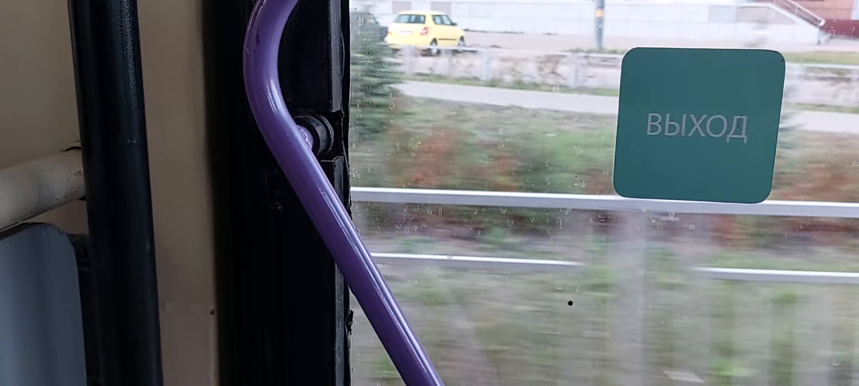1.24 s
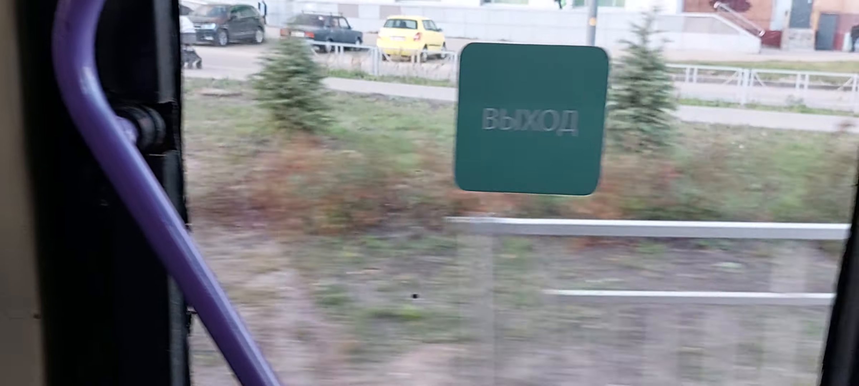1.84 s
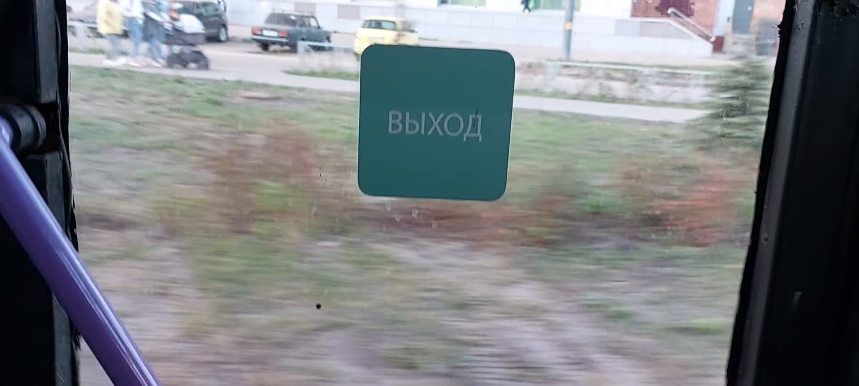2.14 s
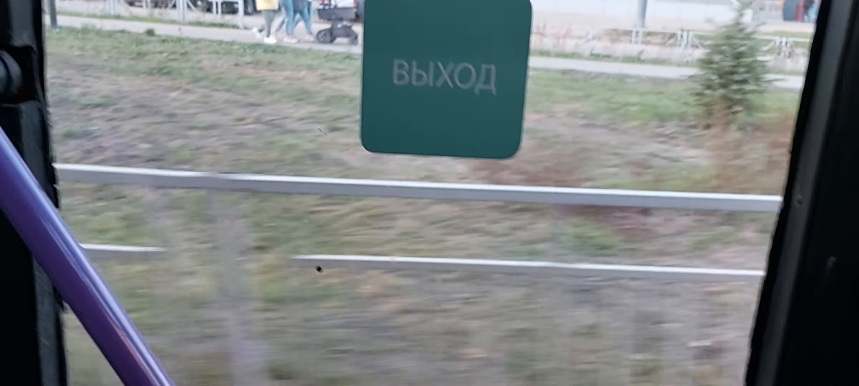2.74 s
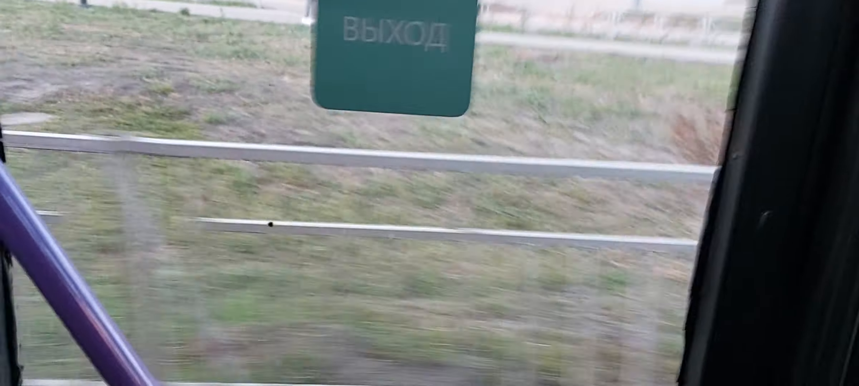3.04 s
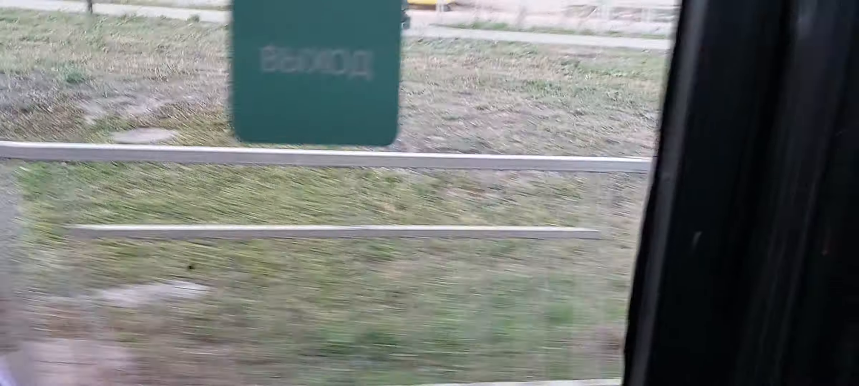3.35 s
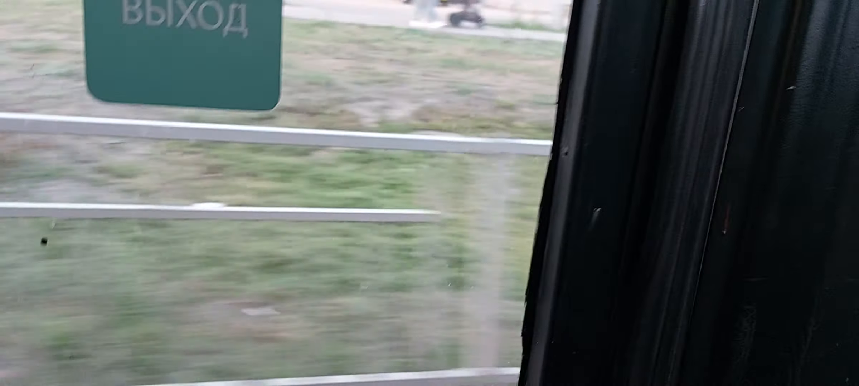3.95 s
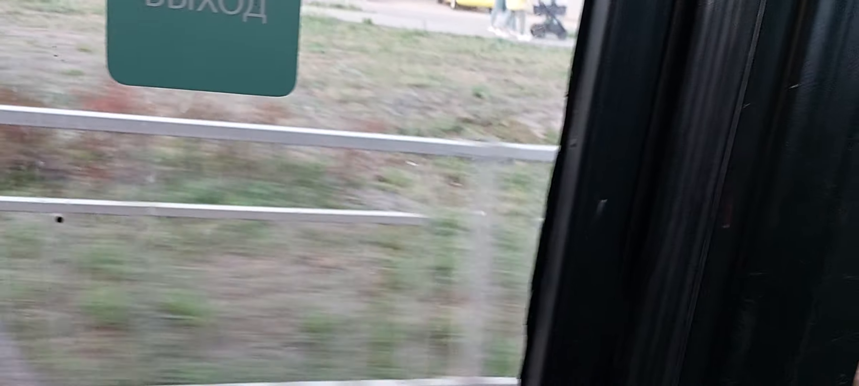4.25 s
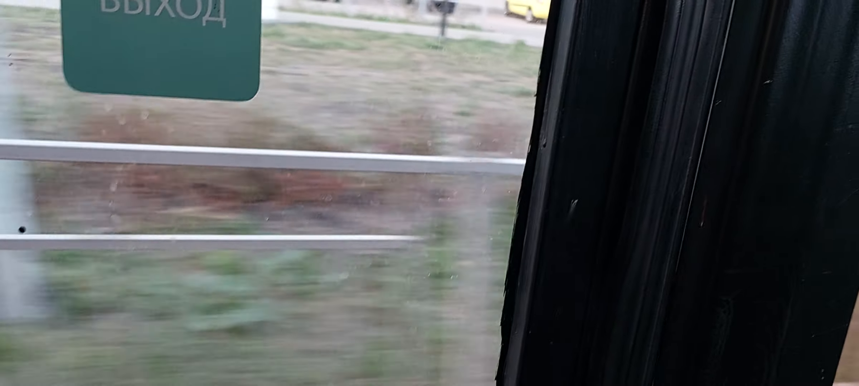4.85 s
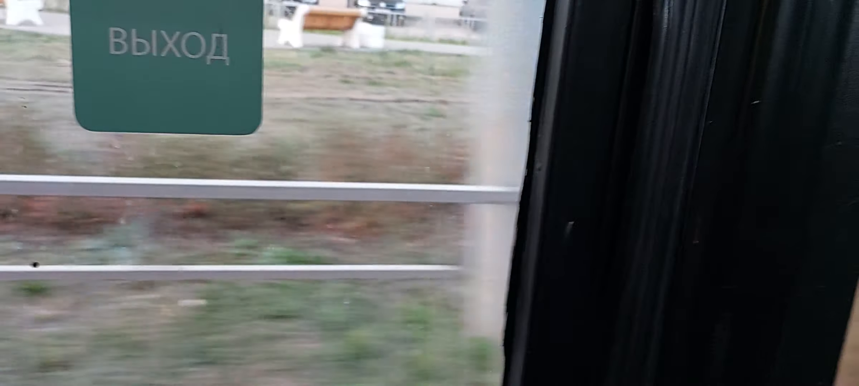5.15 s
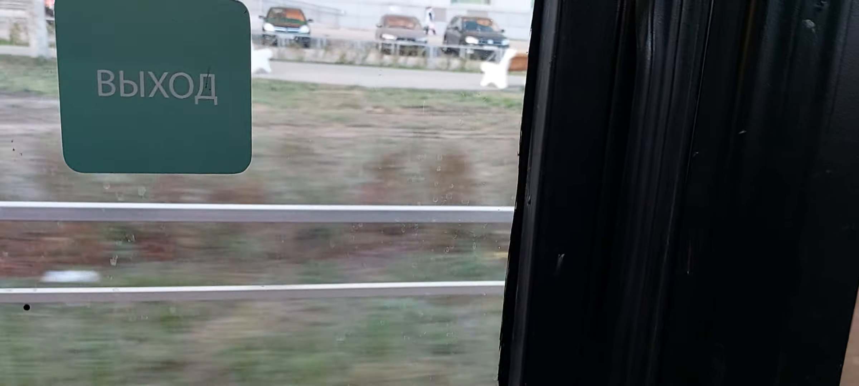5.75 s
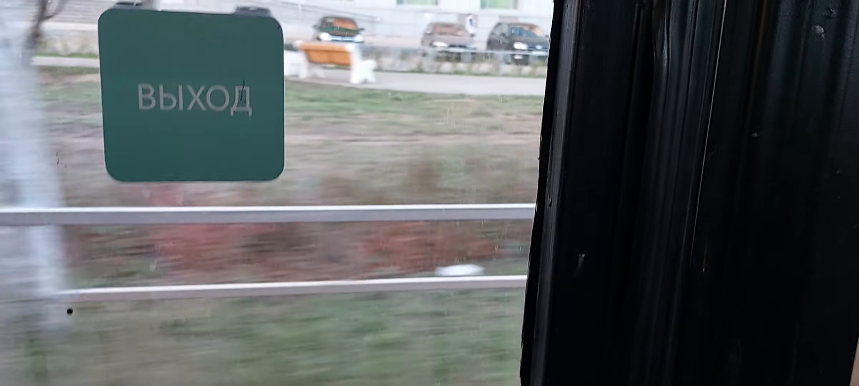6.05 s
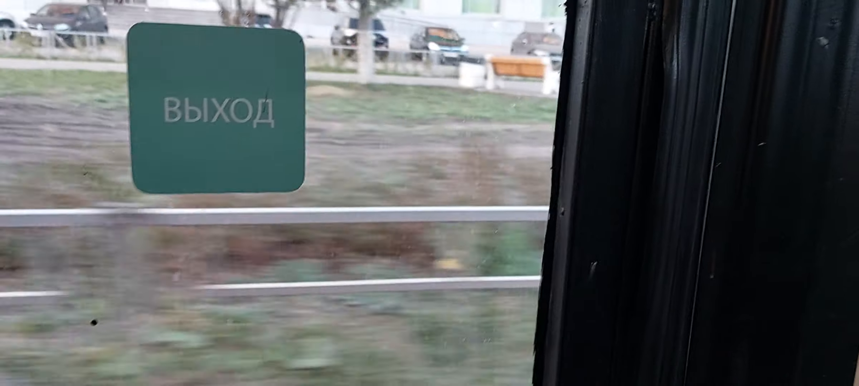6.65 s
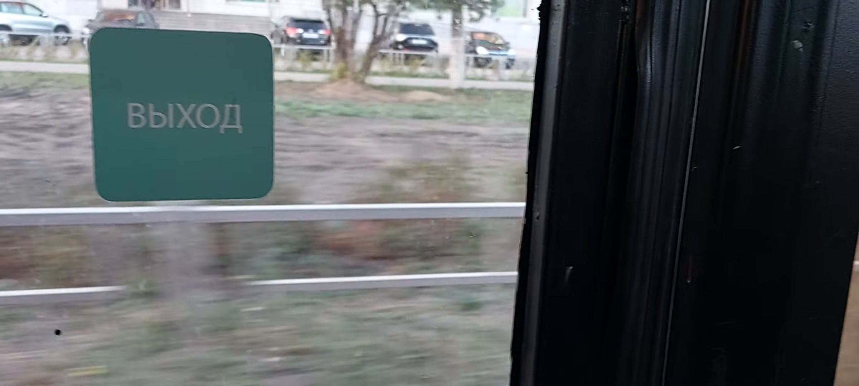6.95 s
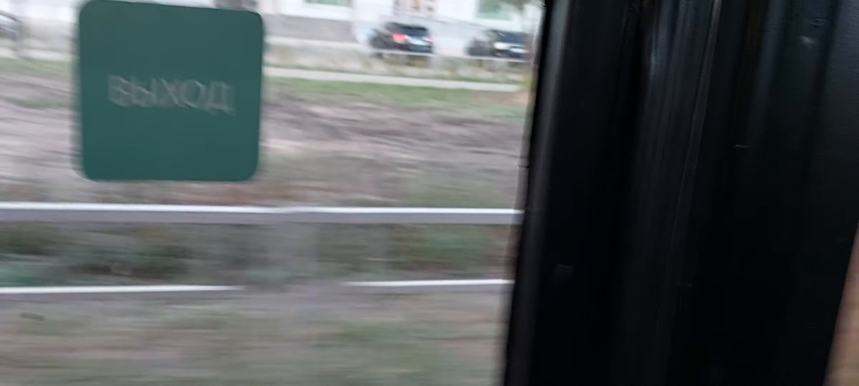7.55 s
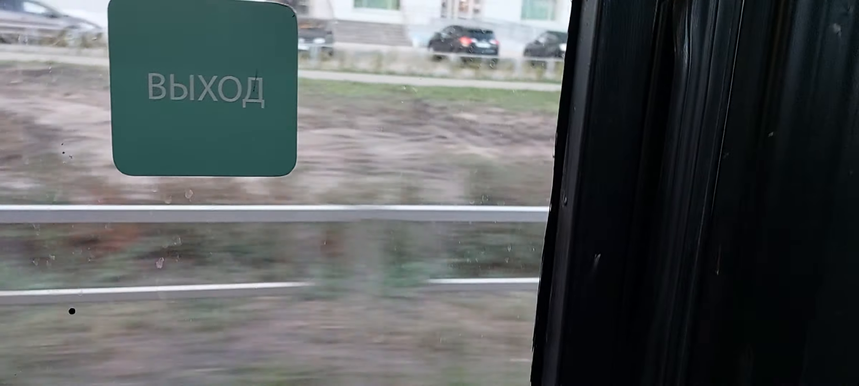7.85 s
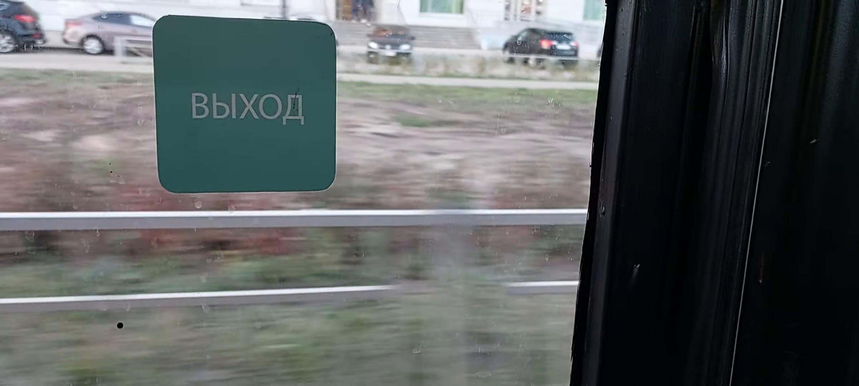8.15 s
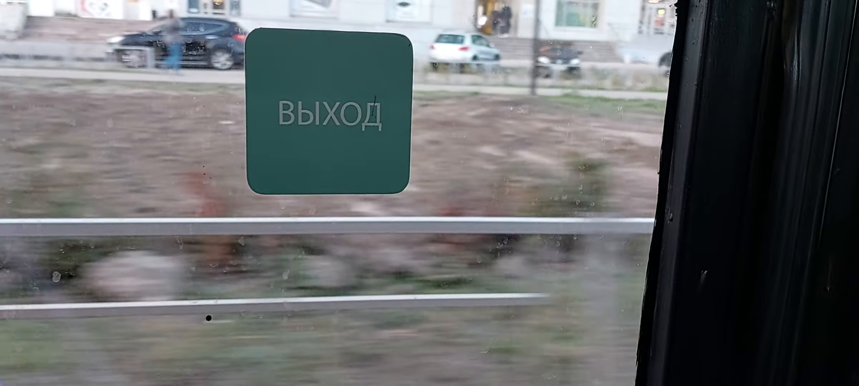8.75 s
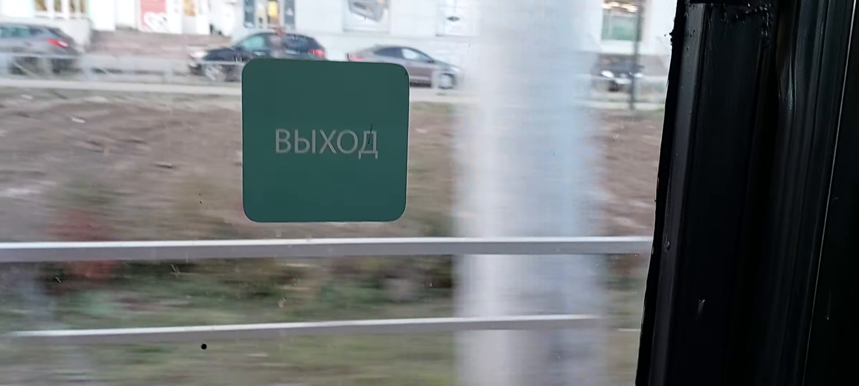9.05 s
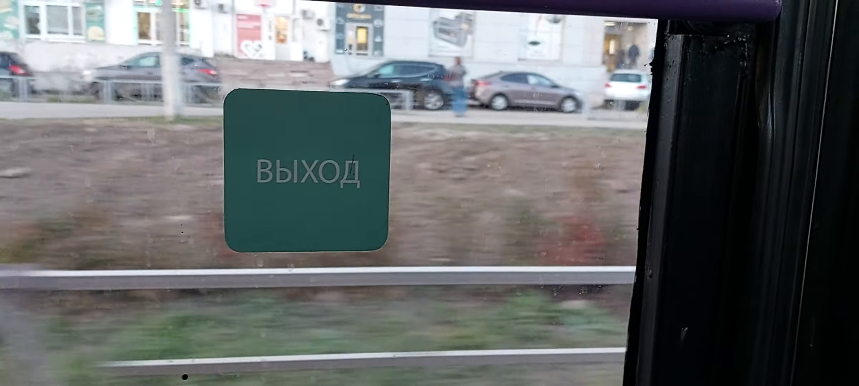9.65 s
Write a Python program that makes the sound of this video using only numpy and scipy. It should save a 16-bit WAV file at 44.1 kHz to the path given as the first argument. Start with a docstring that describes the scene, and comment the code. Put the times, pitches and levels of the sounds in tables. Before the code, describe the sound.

A trolleybus rolls along with road rumble, rattling fittings and thuds; its motor hum rises, then cuts out as it coasts.

```python
"""A traction drive hums over the rumble, roar and cabin boom of rolling tyres: inside a moving trolleybus,
a stereo microphone close by the door. Panels tremble, and chatter on rough patches; loose metal fittings
click and the body thuds in the dips. On the biggest bump the door bangs against its frame and a bracket
squeals briefly. The hum climbs in pitch and a dry joint starts to chirp; about six seconds in, the power
cuts out and the bus coasts on, still rattling."""
import sys
import numpy as np
from scipy import signal
from scipy.fft import rfft, irfft, next_fast_len
from scipy.io import wavfile
from scipy.ndimage import uniform_filter1d

SR = 44100
rng = np.random.default_rng(int(sys.argv[2]) if len(sys.argv) > 2 else 0)


def file_out(sig):
    """Save sig as 16-bit WAV at sys.argv[1]."""
    # one column per channel
    cols = np.atleast_2d(sig).T
    # limit, then scale
    lim = np.clip(cols, -1, 1)
    pcm = np.round(lim * 32767).astype(np.int16)
    wavfile.write(sys.argv[1], SR, pcm)


N = 436149
TIME = np.arange(N) / SR
LEFT_LEAD_S = .00053  # knocks reach the left of the microphone this much sooner

# Levels in the tables are relative: each source adds its own gain.
# drive speed, rising under power and falling as the bus coasts: (time [s], hum pitch [Hz])
DRIVE_PITCH = [(0, 119.9), (3.8, 121.1), (4.5, 125.6), (5.2, 133), (5.7, 137.6), (6.3, 141.5), (7.9, 138.8),
               (9.88, 128)]
# fundamental of the hum: (time [s], level [dB])
HUM_LEVEL = [(0, -34), (.37, -18), (.87, -34), (1.6, -33), (2.15, -23), (2.77, -17), (3.28, -26.5),
             (3.68, -16.5), (5.5, -15), (6.16, -31)]
# load on the drive, heard in its overtones: (time [s], level [dB])
DRIVE_LOAD = [(0, -34.5), (.4, -30.5), (.7, -42), (1.7, -40), (2, -29.5), (2.9, -30.5), (3.7, -33),
              (5.2, -31), (6.15, -34)]
# overtones of the hum: (multiple of the pitch, level [dB])
HUM_OVERTONES = [(2, 1), (3, -6.5), (4, -9), (5, -17), (6, -17.5)]
# air modes of the cabin: (frequency [Hz], width [Hz], lift [dB])
CABIN_MODES = [(161.5, 11, 6), (209, 31.5, 5.5), (259.3, 25, 4), (372, 30, 4), (413, 18, 5.5), (562, 26, 3)]
# likeness of the cabin sound on the two channels: (frequency [Hz], correlation)
STEREO_LIKENESS = [(60, 1), (140, 0.95), (260, 0.94), (500, 0.74), (900, 0.2), (1400, 0.22)]
# earlier arrival of the cabin sound on the left: (frequency [Hz], lead [s])
STEREO_LEAD = [(150, 0.00018), (850, 0.00019), (1100, 0.000392)]
# balance of the cabin sound: (frequency [Hz], left minus right [dB])
STEREO_BALANCE = [(170, -1.5), (500, -4), (1000, -2), (3000, -3), (8000, 10)]
# grain of the road surface: (time [s], body roar [dB], tyre rush [dB])
ROAD_GRAIN = [(0, -30, -37.5), (.85, -30, -36.5), (1.4, -25.5, -36), (2.9, -30.5, -39), (4.5, -34.5, -43.5),
              (5.2, -29, -41), (6.85, -33, -43), (7.25, -27.5, -36.5), (8.6, -29, -42), (9.88, -25.5, -37)]
# shaking of the body: (time [s], rumble [dB], cabin boom [dB])
BODY_SHAKE = [(0, -34, -23), (.55, -35, -29), (1.42, -32, -23), (2.9, -36, -23.5), (3.12, -19.5, -20),
              (3.48, -32, -20), (3.66, -39, -32.5), (5.5, -37.5, -24), (6.66, -37.5, -30.5),
              (7.4, -26.5, -19), (8, -34, -21), (9.88, -34, -23)]
# spectra of body rumble, body roar and rattling panels: (frequency [Hz], level [dB])
RUMBLE_SPECTRUM = [(12, -25), (40, -7), (50, 3), (62, 0), (90, -27.5), (200, -61.5)]
ROAR_SPECTRUM = [(50, -32.5), (95, 5.5), (135, 10), (185, -1), (300, 0.5), (500, -7), (660, -14),
                 (850, -16.5), (3000, -87.5)]
PANEL_SPECTRUM = [(1500, -9.5), (2500, 3.5), (4200, 5.5), (5400, 3), (7000, -7.5), (9400, -17), (11300, -7),
                  (13500, -3.5), (16000, -16)]
# tyre rush, with the microphone's dip near 9 kHz and lift near 13 kHz: (frequency [Hz], level [dB])
RUSH_AT_MICROPHONE = [(300, -8), (780, 6), (1500, -1.5), (2400, -9.5), (5000, -23.5), (9300, -39.5),
                      (12800, -37.5), (16000, -45)]
# resonances of the door panels: (frequency [Hz], width [Hz], lift [dB])
DOOR_PANEL_MODES = [(2320, 320, 6.5), (2775, 77, 6.5), (6050, 28, 0.5)]
# rough patches of road: (time [s], length [s], panel chatter [dB], road noise lift [dB])
ROUGH_PATCHES = [(0.085, 0.052, -59.5, 3), (0.46, 0.06, -62.5, -0.5), (0.577, 0.02, -54.5, 0.5),
                 (0.74, 0.084, -63, -0.5), (1.06, 0.047, -56, 3.5), (1.486, 0.056, -70, 1.5),
                 (1.716, 0.069, -50.5, -1.5), (1.885, 0.036, -52, 4.5), (1.992, 0.062, -56.5, 0),
                 (2.984, 0.48, -56.5, 5), (3.501, 0.2, -64.5, 5.5), (5.71, 0.026, -57.5, 1),
                 (5.827, 0.035, -57.5, 0), (6.106, 0.13, -63.5, 0.5), (6.492, .15, -65, 5.5),
                 (6.987, 0.29, -62.5, 1.5), (7.323, 0.25, -59, 3), (7.796, 0.26, -62.5, 1),
                 (8.957, 0.035, -61, 0), (9.587, 0.079, -54, 0), (9.703, 0.07, -57.5, -1)]
# loose fittings knock: (time [s], clack [dB], tick [dB])
FITTING_KNOCKS = [(0.338, -58, -50), (1.28, -36, -48), (1.678, -33, -41), (2.057, -32.5, -50),
                  (2.321, -39, -59), (2.798, -43, -43.5), (3.125, -35, -37), (3.152, -32, -35),
                  (3.222, -36, -32.5), (3.335, -30.5, -33), (3.402, -28.5, -34), (3.474, -37, -40),
                  (3.498, -33, -39), (3.563, -26.5, -34), (3.668, -38, -42), (3.7247, -34.5, -42),
                  (3.891, -35.5, -45), (6.455, -38.5, -50), (6.946, -47, -43), (7.051, -55, -41),
                  (7.319, -28.5, -37), (7.454, -34, -31.5), (7.5174, -31, -27), (7.55, -37, -32),
                  (7.5886, -32, -40), (7.697, -41, -42), (7.7263, -40, -35), (7.989, -37, -33),
                  (8.0117, -34, -30), (8.081, -35.5, -34), (8.109, -36.5, -34), (8.261, -37.5, -66),
                  (8.912, -48, -42)]
# spectra of their dull clack and bright tick: (frequency [Hz], level [dB])
CLACK_SPECTRUM = [(300, -30), (1100, -2), (2500, 0.5), (5300, 1.5), (7000, -6.5), (9500, -19), (16000, -23)]
TICK_SPECTRUM = [(9300, -15), (10800, 4), (11600, -3), (12800, 6), (14200, -1), (16000, -6)]
# the wheels drop into dips: (time [s], shudder [dB], shudder pitch [Hz], floor knock [dB])
JOLTS = [(1.94, -19, 245, -40), (2.095, -20, 241, -45), (3.072, -27.5, 559, -23), (3.18, -28, 580, -28),
         (3.41, -21.5, 296, -28), (6.58, -34, 460, -24), (8.29, -16.5, 280, -40), (9.833, -18.5, 253, -32)]
# modes of the floor panel: (frequency [Hz], level [dB], t60 [s])
FLOOR_MODES = [(526, 3, 0.061), (586, 6, 0.094)]
# the latch snaps in its catch: (time [s], level [dB])
LATCH_SNAPS = [(3.039, -20), (3.631, -39), (3.85, -36.5), (6.331, -42)]
# the door leaf hits its frame and rebounds: (time [s], level [dB])
DOOR_BLOWS = [(3.043, -19), (3.047, -29), (3.077, -30), (3.151, -30), (3.337, -29.5), (3.404, -31),
              (5.727, -39.5), (6.58, -47), (7.396, -34), (7.82, -43), (9.724, -38)]
# spectrum of those blows: (frequency [Hz], level [dB])
BANG_SPECTRUM = [(300, -8), (700, 2.5), (2000, -6.5), (2800, -9), (5500, -20), (16000, -39)]
# modes of the door leaf: (frequency [Hz], level [dB], t60 [s])
DOOR_MODES = [(740, -10, 0.17), (1233, -11, 0.19), (1520, -14, .08), (2230, -11, 0.053), (2510, -16, 0.3),
              (2740, 6.5, 0.02), (2990, -19, 0.2)]
# a bracket scrapes: (time [s], length [s], level [dB], starting pitch [Hz], step per overtone [dB])
BRACKET_SCRAPES = [(3.396, 0.043, -48, 2880, -4), (9.622, 0.049, -52, 2970, -11)]
# spells in which a dry joint chirps: (time [s], length [s], level [dB])
JOINT_SPELLS = [(5.125, .6, -51), (5.984, .09, -42), (6.198, .2, -49), (6.988, .09, -42), (8.339, .07, -42),
                (8.673, .14, -45), (9.213, .1, -44), (9.884, .01, -38)]
# resonances of that joint: (frequency [Hz], width [Hz], level [dB])
JOINT_MODES = [(3000, 270, -5.5), (3900, 440, 0.5), (6140, 300, -14.5)]


def from_db(db):
    """Decibels to gain."""
    return 10 ** (np.asarray(db) / 20)


def rms_one(x):
    """Scale to unit rms."""
    return x / np.sqrt(np.mean(x ** 2) + 1e-20)


def evened(x, size):
    """Hold the level of a stereo sound at 1 over the given number of samples."""
    return x / np.sqrt(uniform_filter1d(np.mean(x ** 2, axis=0), size=size) + 1e-12)


def in_time(rows):
    """Each column of a curve, at every sample."""
    s, *columns = np.transpose(rows)
    return [np.interp(TIME, s, c) for c in columns]


def at_hz(points, hz):
    """Read a spectrum on a log-frequency axis."""
    f, value = np.transpose(points)
    return np.interp(np.log(hz + 1e-3), np.log(f), value)


def drift(rate_hz):
    """Smooth random wander with spread 1."""
    r = np.exp(-80 * np.pi * rate_hz / SR)
    slow = signal.lfilter([1], [1, -2 * r, r * r], rng.standard_normal(N // 40 + 2002))[2000:]
    return np.interp(np.arange(N) / 40, np.arange(len(slow)), rms_one(slow))


def pan(left_db):
    """Channel gains for a left-minus-right level."""
    return from_db(np.array([[left_db], [-left_db]]) / 2)


def colour(x, spectrum):
    """Causal (minimum-phase) filter with the given spectrum; white noise keeps its power."""
    size = 2 * next_fast_len(N // 2 + SR // 4)
    gain = rms_one(from_db(at_hz(spectrum, np.fft.rfftfreq(size, 1 / SR))))
    cepstrum = irfft(np.log(gain))
    cepstrum[1:size // 2] *= 2
    cepstrum[size // 2 + 1:] = 0
    return irfft(rfft(x, size) * np.exp(rfft(cepstrum)))[..., :N]


def resonance(x, hz, width_hz):
    """Two-pole band-pass with gain 1 on top."""
    r = np.exp(-np.pi * width_hz / SR)
    poles = [1, -2 * r * np.cos(2 * np.pi * hz / SR), r * r]
    return signal.lfilter(np.array([1, 0, -1]) * (1 - r * r) / 2, poles, x)


def steep_band(x, hz, width_hz):
    """The same resonance twice over."""
    return resonance(resonance(x, hz, width_hz), hz, width_hz)


def through(x, modes):
    """Each mode lifts its own narrow band."""
    for hz, width_hz, db in modes:
        x = x + (from_db(db) - 1) * resonance(x, hz, width_hz)
    return x


def cabin_noise():
    """Noise at the microphone: alike on both sides in the bass, barely related in the treble."""
    size = next_fast_len(N)
    hz = np.fft.rfftfreq(size, 1 / SR)
    alike = np.clip(at_hz(STEREO_LIKENESS, hz), -.999, .999)
    mid, side = rfft(rng.standard_normal((2, size)))
    both = np.sqrt(1 + alike) * mid + np.sqrt(1 - alike) * side * [[1], [-1]]
    both[1] *= np.exp(-2j * np.pi * hz * at_hz(STEREO_LEAD, hz))
    balance = from_db(at_hz(STEREO_BALANCE, hz) * [[.5], [-.5]])
    return rms_one(irfft(both * balance, size)[:, :N])


def excited(envelope, hz, width_hz):
    """A steep resonance shaken by noise that follows the envelope."""
    noise = cabin_noise()
    steady, shaken = steep_band(np.array([noise, envelope * noise]), hz, width_hz)
    return shaken / np.std(steady)


def spell(s, length_s, attack_s, release_s):
    """Attack, hold and release, of height up to 1."""
    since = np.maximum(TIME - s, 0)
    release = np.exp(-np.clip((since - length_s) / release_s, 0, 40))
    return (1 - np.exp(-since / attack_s)) * release


def clicks_at(times, level_db):
    """One impulse for each blow."""
    out = np.zeros(N)
    out[np.clip(np.round(times * SR).astype(int), 0, N - 1)] = from_db(level_db)
    return out


def dying(clicks, t60):
    """Envelope of blows whose energies add and die away."""
    return np.sqrt(signal.lfilter([1], [1, -from_db(-120 / (t60 * SR))], clicks ** 2 + 1e-18))


def left_first(x):
    """A sound reaches the left of the microphone, then the right."""
    return np.array([x, np.interp(TIME - LEFT_LEAD_S, TIME, x)])


def contact(clicks, crack_t60, tail_t60, tail_db):
    """A short direct crack and a diffuse tail from the cabin walls."""
    crack = dying(clicks, crack_t60) * rng.standard_normal(N)
    tail = from_db(tail_db) * dying(clicks, tail_t60) * rng.standard_normal((2, N))
    return left_first(crack) + tail


def ringing(clicks, modes):
    """Every blow sets each mode ringing; neighbouring modes swing in opposite senses."""
    out = np.zeros(N)
    for k, (hz, level_db, t60) in enumerate(modes):
        r, w = from_db(-60 / (t60 * SR)), 2 * np.pi * hz / SR
        ring = signal.lfilter([0, np.sin(w)], [1, -2 * r * np.cos(w), r * r], clicks + 1e-18)
        out += (-1) ** k * from_db(level_db) * ring
    return left_first(out)


def loose_parts(touches, crack_t60, tail_t60, tail_db, count=8):
    """Touches are dealt to a few parts, each with a crack, clear metallic modes and a tail in the cabin."""
    low_hz, high_hz, ring_db, ring_t60 = 2200, 14500, -16, .09
    t = TIME[:SR // 4]
    dealt = rng.integers(0, count, N)
    out = 0
    for part in range(count):
        crack = rng.standard_normal(len(t)) * from_db(-60 * t / crack_t60)
        modes_hz = low_hz * (high_hz / low_hz) ** rng.random((count, 1))
        ring = np.sin(2 * np.pi * modes_hz * t).sum(axis=0) * from_db(ring_db - 60 * t / ring_t60)
        direct = crack + ring
        tail = rng.standard_normal((2, len(t))) * from_db(tail_db - 60 * t / tail_t60)
        response = np.array([direct, np.interp(t - LEFT_LEAD_S, t, direct, left=0)]) + tail
        out = out + signal.fftconvolve([touches * (dealt == part)], response, axes=1)[:, :N]
    return out


def wheel_press(hum_cycles_per_turn=61, first_press_s=.07):
    """An uneven wheel presses once a turn: a swing between -1 and 1."""
    pitch, = in_time(DRIVE_PITCH)
    cycles = np.cumsum(pitch) / SR
    return np.cos(2 * np.pi * (cycles - np.interp(first_press_s, TIME, cycles)) / hum_cycles_per_turn)


def drive_hum(power_off_s=6.17, release_s=.012, throb_s=.338, crest_s=.029, waver=.22):
    """The hum follows drive speed until power is cut, wavering slightly at random in level and phase."""
    (pitch,), (level_db,), (load_db,) = in_time(DRIVE_PITCH), in_time(HUM_LEVEL), in_time(DRIVE_LOAD)
    angle = 2 * np.pi * np.cumsum(pitch) / SR - np.array([[0], [.14]])  # the right side lags
    dip_db = -4 * np.abs((1 - wheel_press()) / 2) ** 20  # one brief dip to each turn of the wheel
    throb_db = 1.44 * np.cos(2 * np.pi * (TIME - crest_s) / throb_s)
    tone = np.sin(angle) + waver * (drift(17) * np.sin(angle) + drift(17) * np.cos(angle))
    hum = np.sqrt(2) * from_db(level_db + dip_db + throb_db - 1) * tone
    whine = 0
    for multiple, db in HUM_OVERTONES:
        k = round(multiple)
        wobble = 1 + k * .29 * (drift(k * 2) + 1j * drift(k * 2))  # level and phase, high overtones most
        whine = whine + from_db(db) * rms_one(np.real(wobble * np.exp(1j * k * angle)))
    whine = from_db(load_db - 2.5) * through(whine, CABIN_MODES)
    powered = np.exp(-np.maximum(TIME - power_off_s, 0) / release_s)
    return powered * (hum * pan(-1.2) + whine * pan(-5))


def tyres(lift_db, wheel_swell_db=2, rush_share=.62):
    """Tyres heard through the body: rumble, a booming cabin mode, roar, and a microphone-coloured rush."""
    (roar_db, rush_db), (rumble_db, boom_db) = in_time(ROAD_GRAIN), in_time(BODY_SHAKE)
    rumble = from_db(rumble_db - 1) * rms_one(colour(cabin_noise(), RUMBLE_SPECTRUM))
    # the rolling wheels keep the boom fed, with a swell on every turn
    boom = evened(steep_band(cabin_noise(), hz=77, width_hz=13), size=SR // 4)
    boom *= from_db(boom_db - 4.5 + wheel_swell_db * wheel_press())
    roar_gain = from_db(roar_db + lift_db + 4 + 1.07 * drift(18))
    roar = roar_gain * rms_one(colour(through(cabin_noise(), CABIN_MODES), ROAR_SPECTRUM))
    rush_gain = from_db(rush_db + rush_share * lift_db + .5 + 1.13 * drift(16))
    rush = rush_gain * colour(cabin_noise(), RUSH_AT_MICROPHONE)
    return rumble + boom + roar + rush


def panel_tremble(per_s=300, rush_share=.41):
    """Panels and seals tremble all the time in tiny contacts, a little more as the tyre rush grows."""
    _, rush_db = in_time(ROAD_GRAIN)
    touches = (rng.random(N) < per_s / SR) * rng.standard_normal(N)
    grains = rms_one(loose_parts(touches, crack_t60=.021, tail_t60=.18, tail_db=-.5))
    gain = from_db(-61 + rush_share * (rush_db - rush_db.mean()))
    return gain * colour(through(grains, DOOR_PANEL_MODES), PANEL_SPECTRUM) * pan(-14.5)


def bumps():
    """The body takes up a bump quickly and settles slowly: panel shaking (gain), road noise lift (dB)."""
    shaking = lift_db = 0
    for s, length_s, chatter_db, rise_db in ROUGH_PATCHES:
        shape = spell(s, length_s, attack_s=.0094, release_s=.033)
        shaking = shaking + from_db(chatter_db) * shape
        lift_db = lift_db + rise_db * shape
    return shaking, lift_db


def panel_chatter(shaking, per_s=190):
    """Over rough patches the door panels clatter in quick, uneven contacts, each with a brief ring."""
    s = np.cumsum(rng.uniform(.2, 1.8, N // 100)) / per_s
    sizes_db = 5 * np.minimum(rng.exponential(1, len(s)), 2)
    touches = clicks_at(s[s < TIME[-1]], sizes_db[s < TIME[-1]])
    grains = loose_parts(touches * shaking, crack_t60=.018, tail_t60=.17, tail_db=-3.5)
    return from_db(4) * colour(through(grains, DOOR_PANEL_MODES), PANEL_SPECTRUM) * pan(-5.5)


def loose_fittings():
    """Loose metal parts knock on the panels: a dull clack and a bright tick."""
    s, clack_db, tick_db = np.transpose(FITTING_KNOCKS)
    clack = contact(clicks_at(s, clack_db), crack_t60=.03, tail_t60=.19, tail_db=-2)
    tick = contact(clicks_at(s, tick_db), crack_t60=.018, tail_t60=.13, tail_db=-12)
    clack = from_db(-5) * colour(clack, CLACK_SPECTRUM) * pan(-3.4)
    tick = from_db(1) * colour(tick, TICK_SPECTRUM) * pan(-1)
    return through(clack + tick, DOOR_PANEL_MODES)


def body_thuds():
    """Each jolt knocks on the floor and, cushioned by the springs, sets a band of body modes shuddering."""
    shudder = 0
    noise = cabin_noise()
    for s, db, hz, _ in JOLTS:
        band = evened(steep_band(noise, hz, width_hz=110), size=SR // 40)
        envelope = uniform_filter1d(dying(clicks_at(s, db), t60=.39), size=SR // 100)
        shudder = shudder + band * envelope
    s, _, _, knock_db = np.transpose(JOLTS)
    return shudder + ringing(clicks_at(s, knock_db), FLOOR_MODES) * pan(-5.5)


def door():
    """Close by, the latch snaps; the leaf slams or nudges its frame over bumps and rings briefly."""
    snaps = clicks_at(*np.transpose(LATCH_SNAPS))
    latch = excited(dying(snaps, t60=.012), hz=3500, width_hz=2000)
    blows = clicks_at(*np.transpose(DOOR_BLOWS))
    bang = colour(contact(blows, crack_t60=.024, tail_t60=.22, tail_db=-6.5), BANG_SPECTRUM)
    leaf = from_db(-1) * (bang + ringing(blows, DOOR_MODES))
    return (latch + leaf) * pan(-8.5)


def bracket_squeal(rise_hz_per_s=1500, jitter=.0158, fundamental_db=-2):
    """A metal bracket scrapes on its seat: a brief, unsteady note that rises in pitch."""
    out = 0
    for s, length_s, db, hz, step_db in BRACKET_SCRAPES:
        pitch = (hz + rise_hz_per_s * np.clip(TIME - s, 0, length_s)) * (1 + jitter * drift(264))
        angle = 2 * np.pi * np.cumsum(pitch) / SR
        overtones = sum(from_db(step_db * (k - 2)) * np.sin(k * angle) for k in (2, 3, 4))
        note = from_db(fundamental_db) * np.sin(angle) + overtones
        out = out + from_db(db) * spell(s, length_s, attack_s=.003, release_s=.012) * note
    return out * pan(-2.5)


def joint_chirps(hum_cycles_per_turn=3, weak_db=-4, tail_db=-13):
    """In each spell a dry joint slips once per turn of the motor shaft, strongly and weakly by turns."""
    slips = 0
    for start, length_s, db in JOINT_SPELLS:
        turn_s = hum_cycles_per_turn / np.interp(start, *np.transpose(DRIVE_PITCH))
        s = np.arange(start, start + length_s, turn_s)
        slip_db = db - 2 + weak_db * (np.arange(len(s)) % 2) + rng.standard_normal(len(s))
        slips = slips + clicks_at(s, slip_db)
    envelope = dying(slips, t60=.03) + from_db(tail_db) * dying(slips, t60=.2)
    envelope = uniform_filter1d(envelope, size=SR // 400)
    return sum(from_db(db) * excited(envelope, hz, width_hz) for hz, width_hz, db in JOINT_MODES)


def scene():
    """Everything that reaches the microphone by the door."""
    shaking, lift_db = bumps()
    ride = drive_hum() + tyres(lift_db) + body_thuds()
    panels = panel_tremble() + panel_chatter(shaking)
    friction = joint_chirps() + bracket_squeal()
    return ride + panels + friction + loose_fittings() + door()


def record(dry, cutoff_hz=15750):
    """The top is cut steeply."""
    return signal.sosfilt(signal.ellip(10, .1, 90, cutoff_hz, fs=SR, output="sos"), dry)


dry = scene()
out = record(dry)
file_out(out)
```